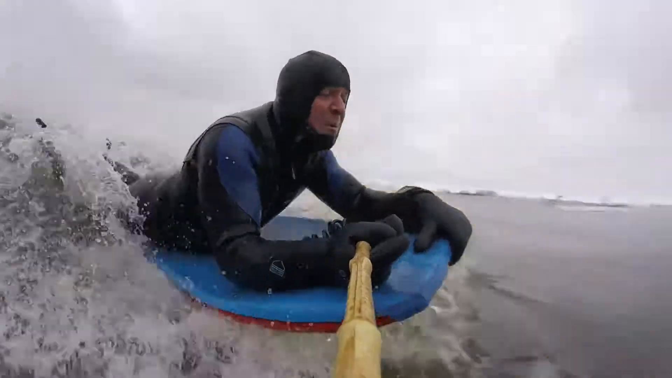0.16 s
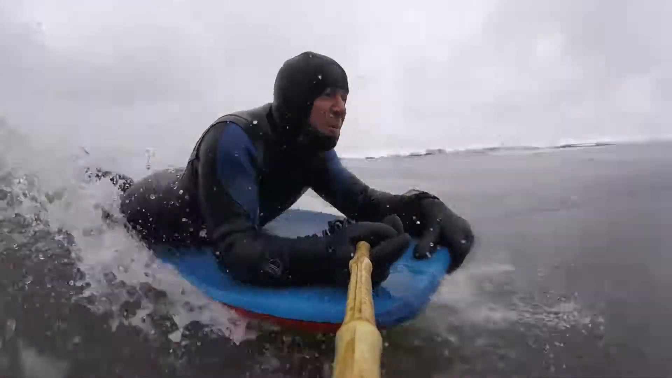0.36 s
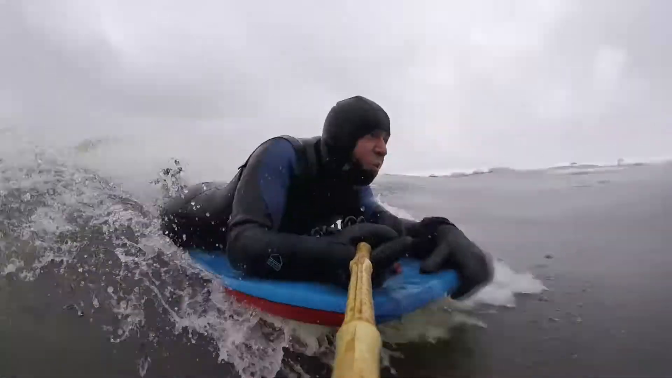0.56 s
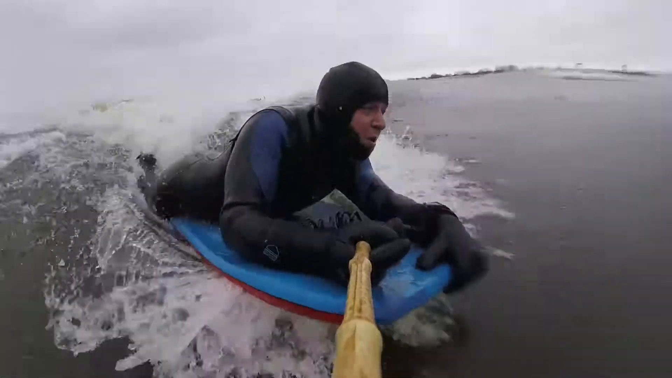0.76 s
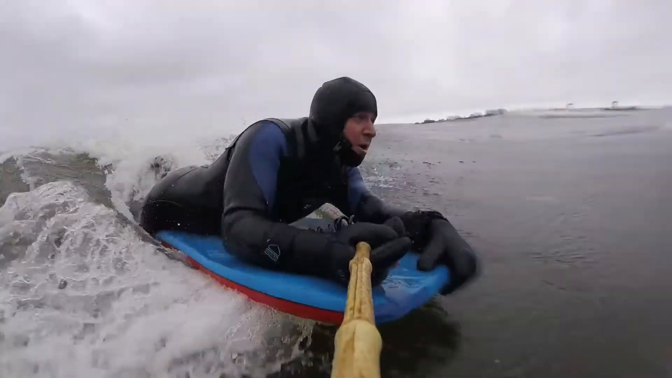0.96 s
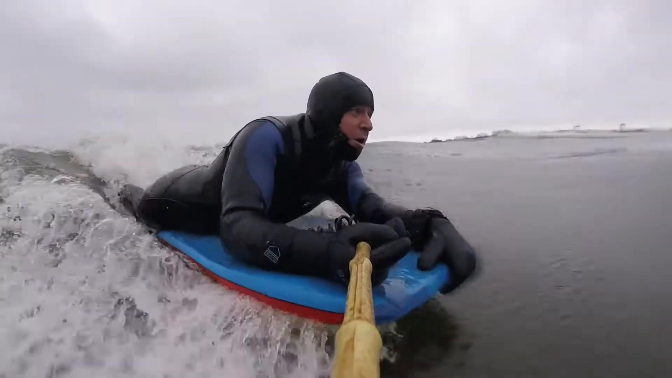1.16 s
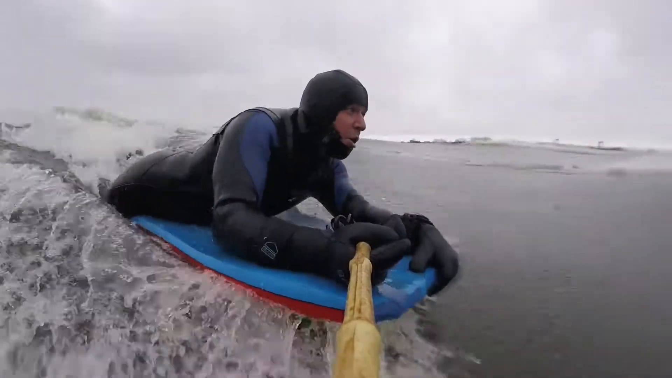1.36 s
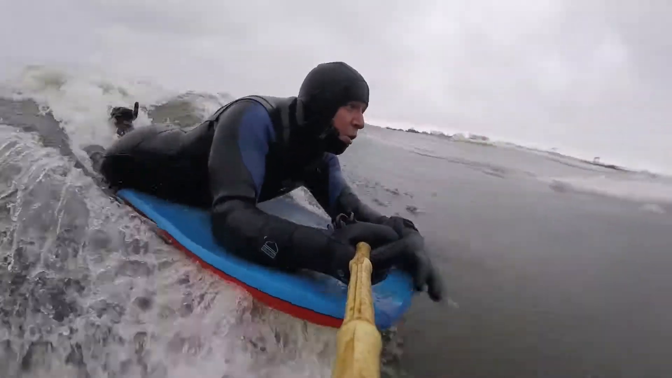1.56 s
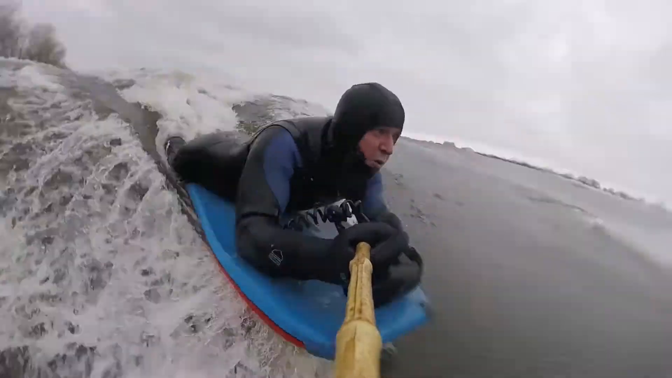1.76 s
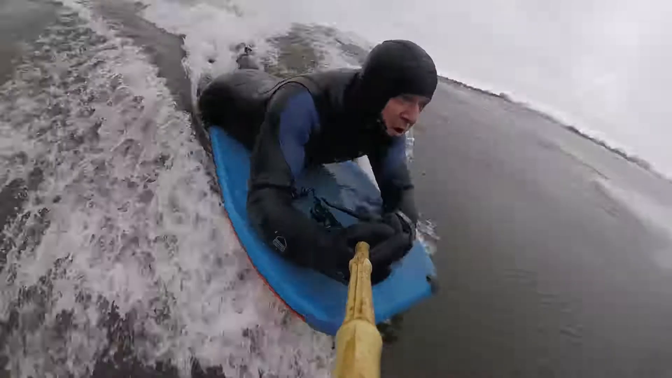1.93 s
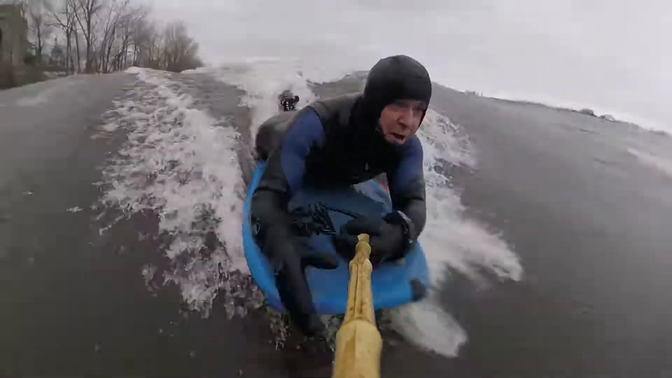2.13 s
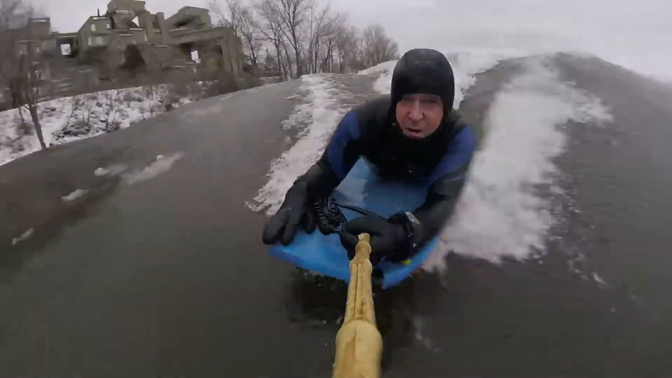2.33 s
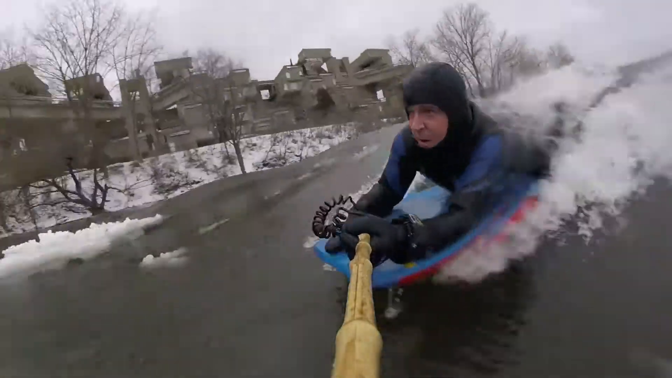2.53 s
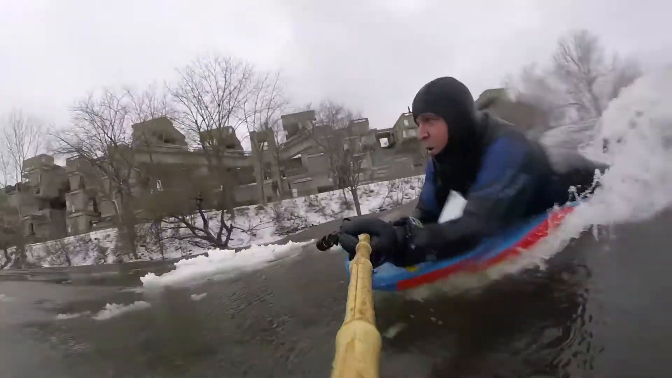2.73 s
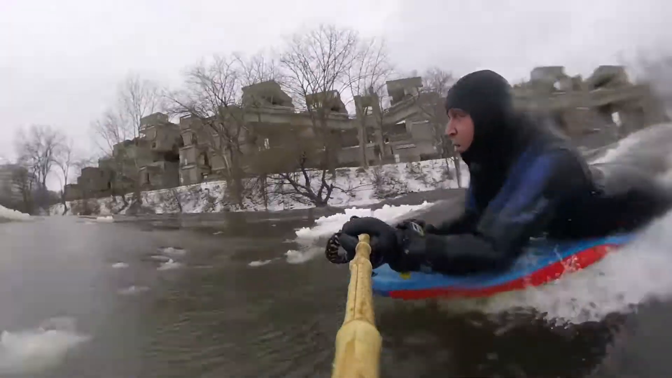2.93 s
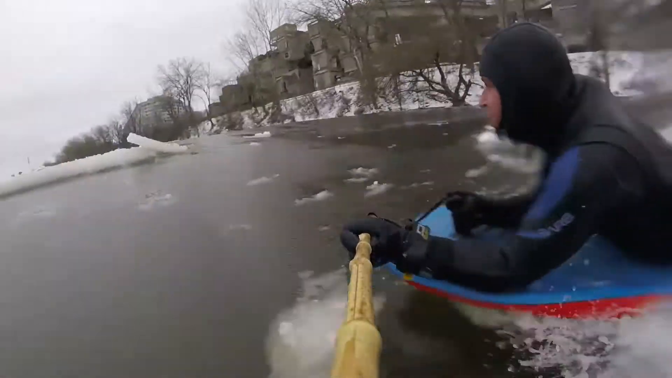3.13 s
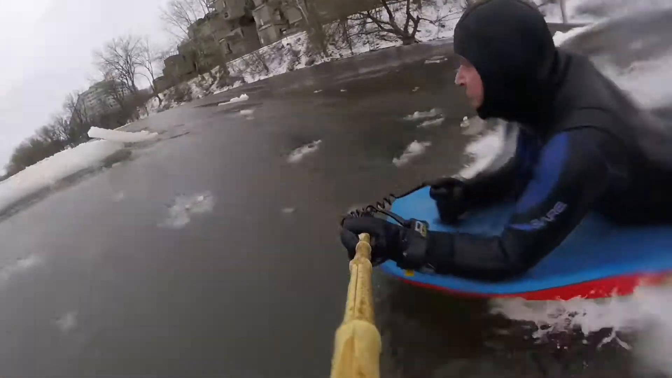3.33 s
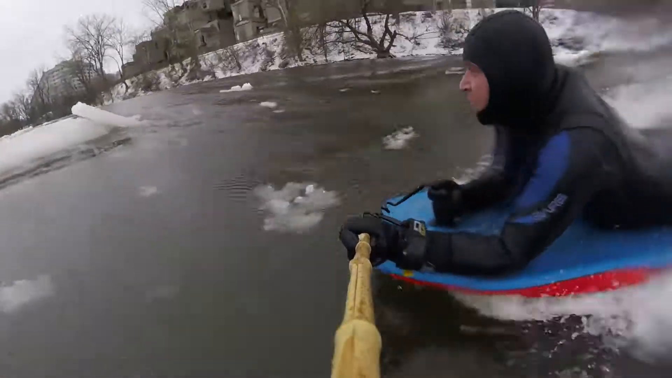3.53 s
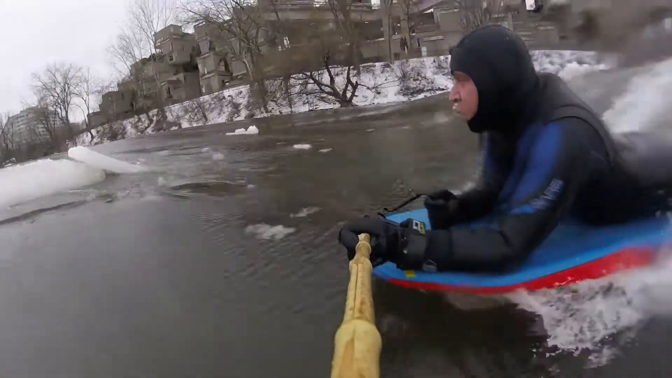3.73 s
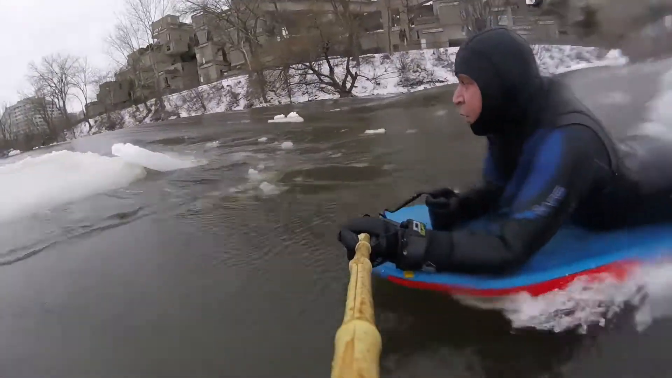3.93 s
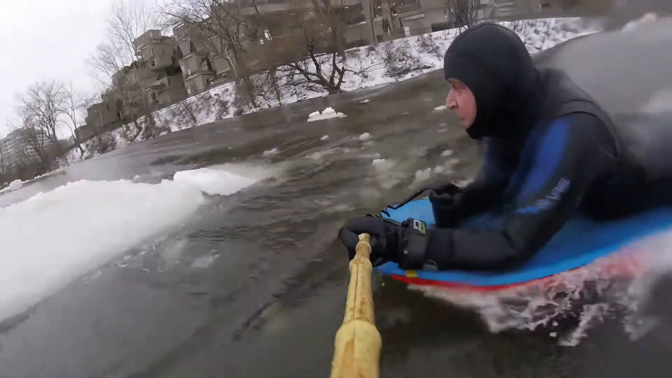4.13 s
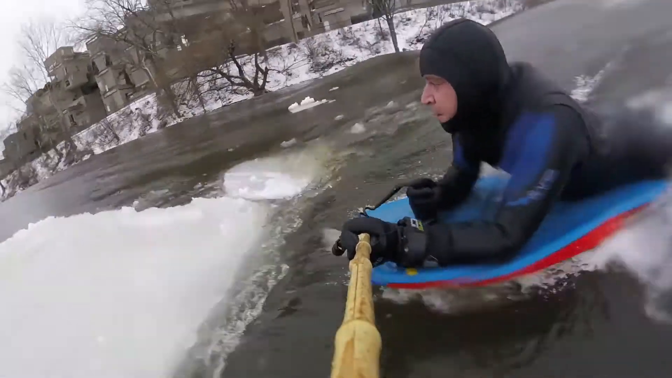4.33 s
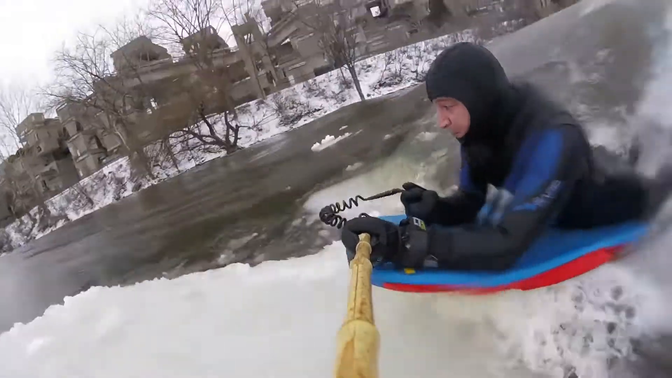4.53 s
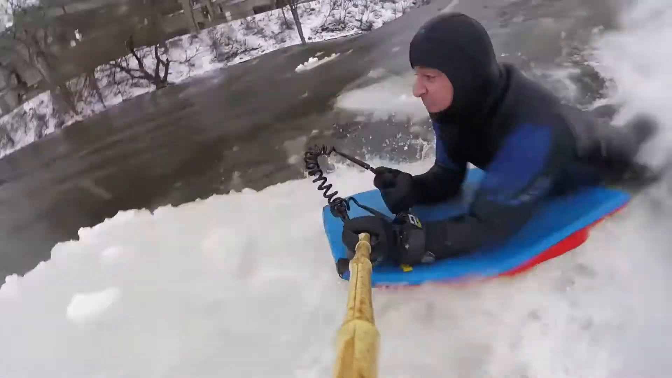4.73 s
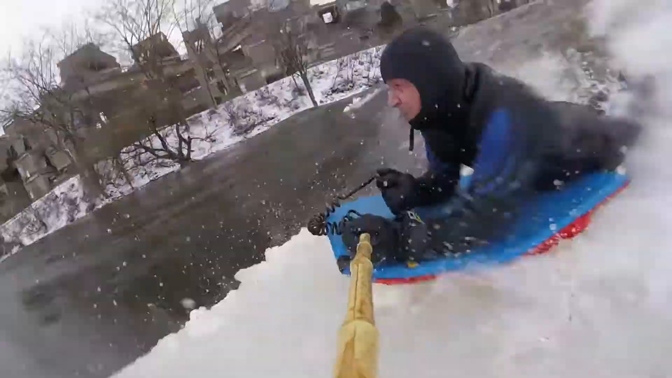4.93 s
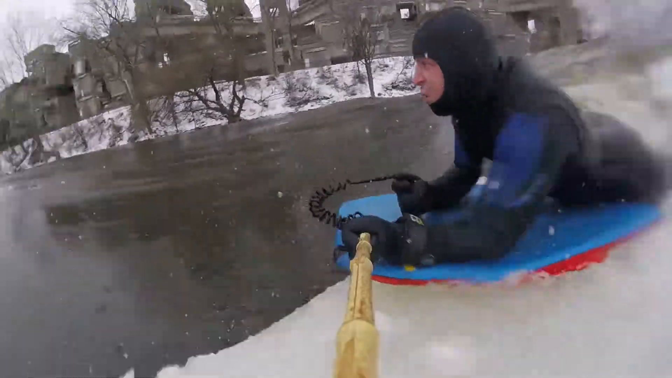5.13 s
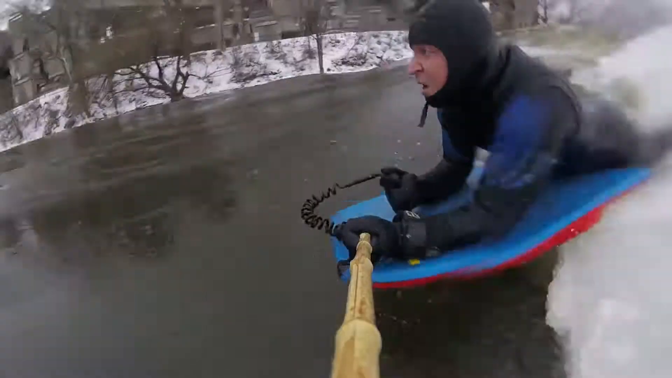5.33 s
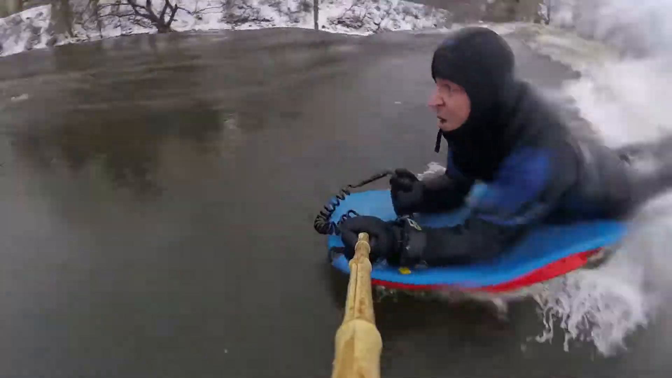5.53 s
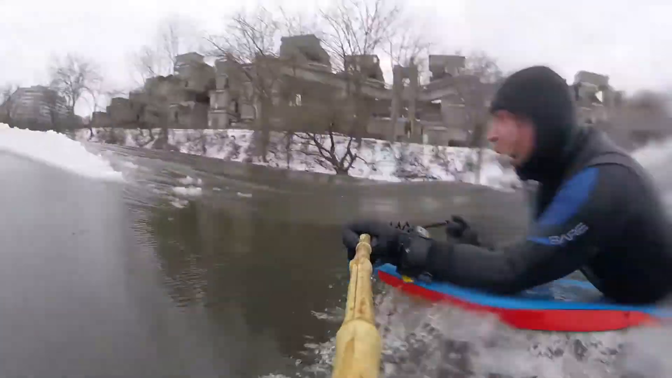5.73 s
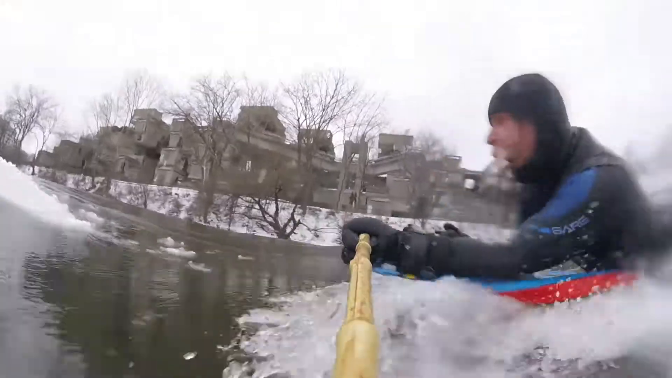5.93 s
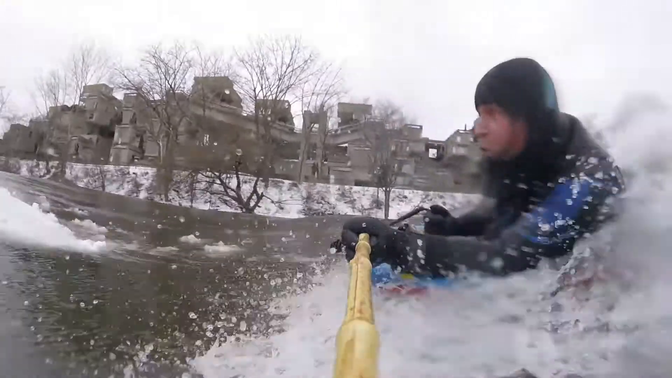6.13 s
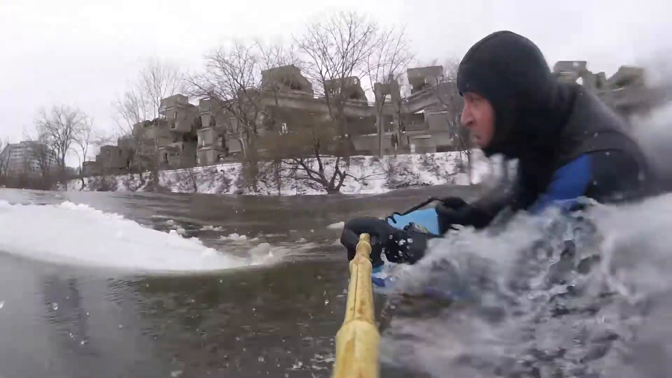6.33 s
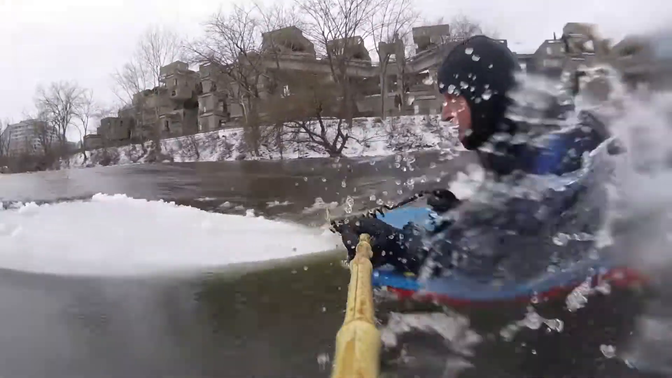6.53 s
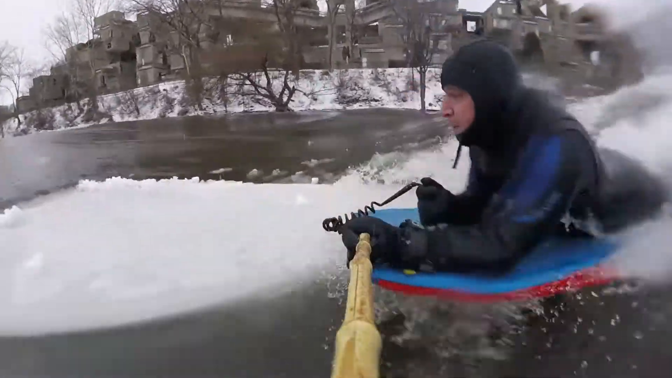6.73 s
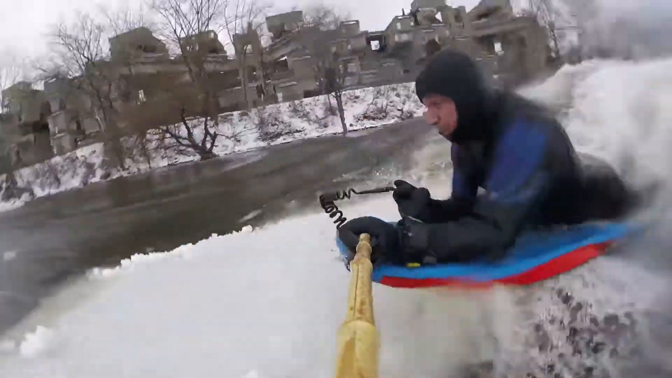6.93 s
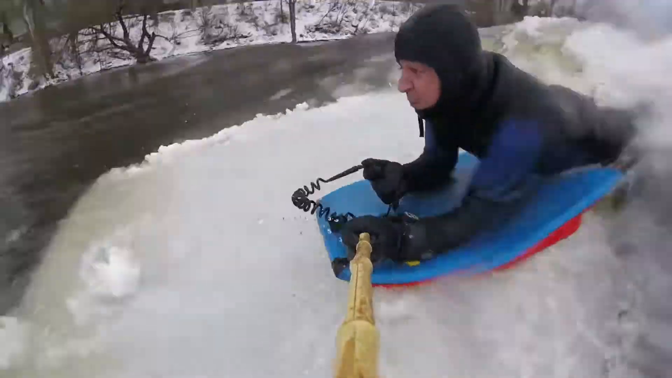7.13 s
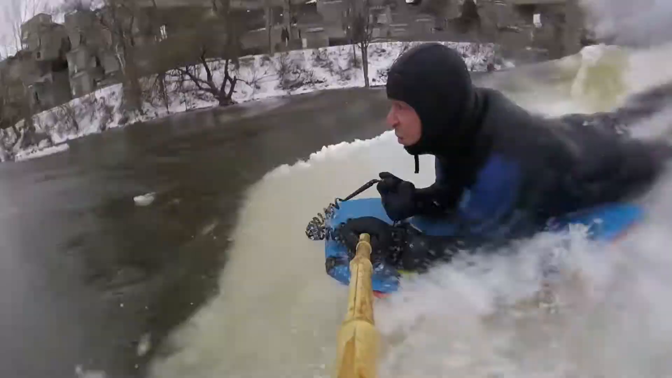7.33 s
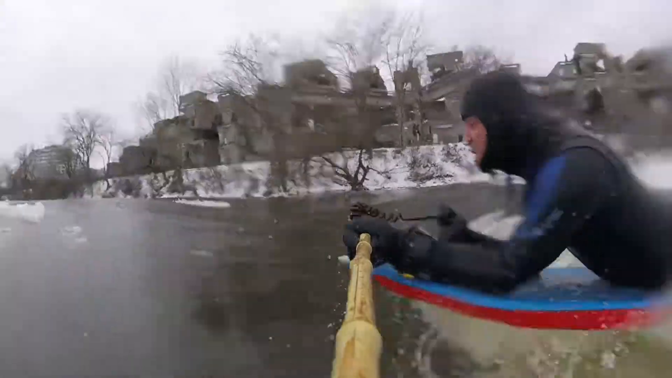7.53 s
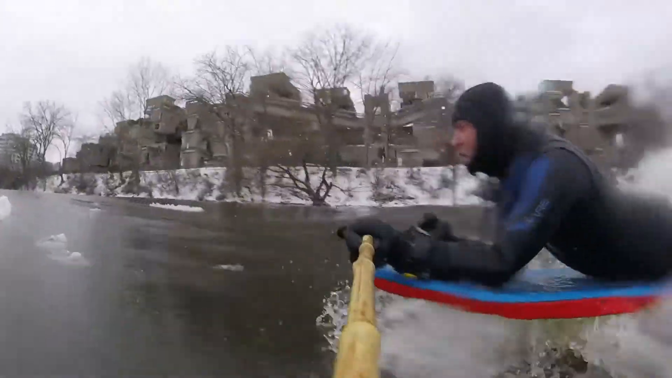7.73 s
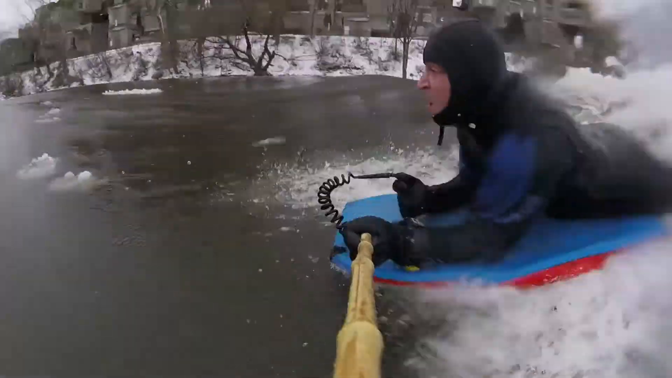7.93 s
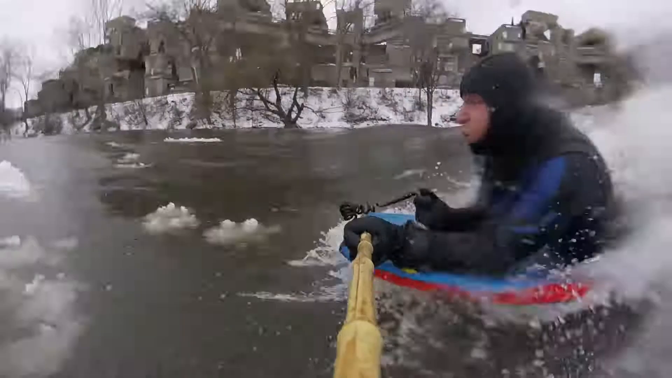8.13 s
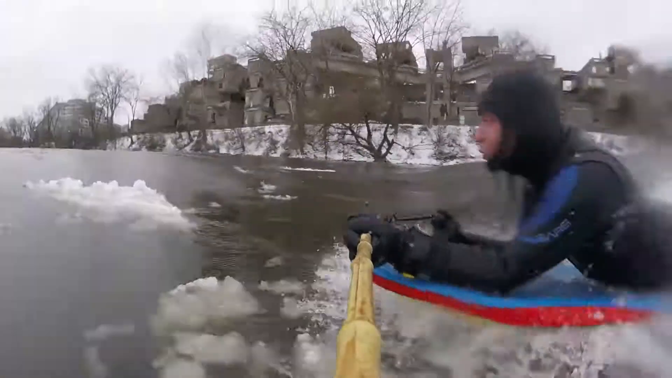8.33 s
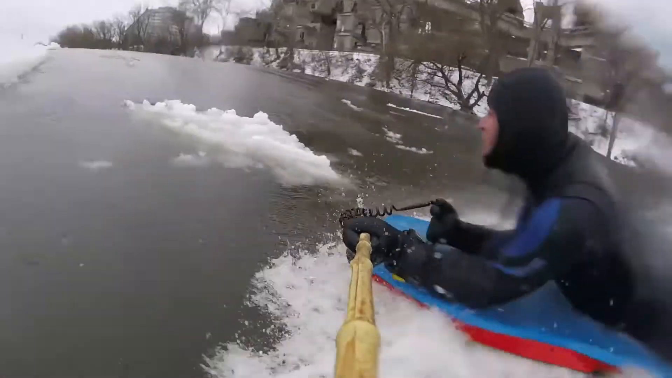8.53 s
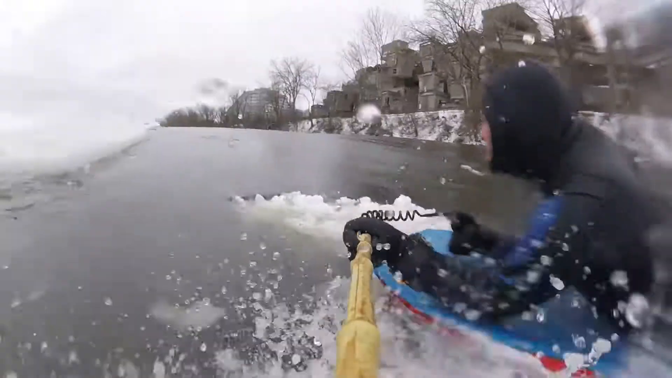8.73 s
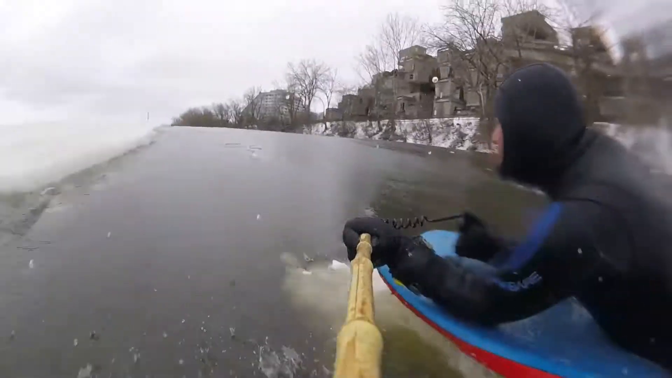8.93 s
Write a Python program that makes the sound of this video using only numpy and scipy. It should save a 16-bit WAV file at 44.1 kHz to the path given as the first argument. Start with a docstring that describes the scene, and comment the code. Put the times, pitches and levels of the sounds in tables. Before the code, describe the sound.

Bubbly, narrow hissing rush of white water around a bodyboard, surging and briefly choking, with sharp spray slaps and deep thumps through the handle.

```python
"""Board on a fast river

Fast water rushes and splashes around a board, heard by a camera microphone on the end of a wooden pole.
The rush is bubbly hiss through a narrow port that whistles near 5-6 kHz; spray wets, shifts and shuts it.
Splashes are noise bursts, blows on the board are gliding tones along the pole, and wind and slosh are
low noise with air bubbles. All of it reaches one microphone, close up."""
import sys
import numpy as np
from scipy import signal
from scipy.fft import rfft, irfft, next_fast_len
from scipy.io import wavfile
from scipy.ndimage import uniform_filter1d, minimum_filter1d, map_coordinates

SR = 44100
rng = np.random.default_rng(int(sys.argv[2]) if len(sys.argv) > 2 else 0)


def master_out(mix):
    """Clip the mix to full scale and print it as 16-bit PCM to the path in sys.argv[1]."""
    frames = np.transpose(np.atleast_2d(mix))
    ceiling = np.clip(frames, -1, 1)
    pcm = np.round(ceiling * 32767).astype(np.int16)
    wavfile.write(sys.argv[1], SR, pcm)


N = 395577  # samples

# The rush before surges: t/s, level in the port resonance/dB, resonance f/Hz, roar relative to it/dB
RUSH_COURSE = [(0, -25, 5490, -5), (.35, -26.5, 5270, -5.5), (.5, -29, 5410, -7), (1.0, -27, 5440, -9),
               (1.75, -25.5, 5340, -9), (2.1, -27, 5520, -8), (2.35, -31, 5420, -7), (2.9, -29.5, 5400, -4),
               (3.25, -27, 5380, -4.5), (3.7, -29, 5470, -4), (4.2, -29, 5430, -3), (4.65, -26, 5440, -5.5),
               (4.9, -23, 5840, -12), (5.4, -30, 6230, -6.5), (5.75, -22.5, 6360, -12),
               (6.05, -22.5, 5930, -11.5), (6.5, -28, 5615, -5), (7.0, -27.5, 5575, -9.5),
               (7.2, -24, 5600, -7.5), (7.5, -29.5, 5850, -8.5), (7.95, -26.5, 5720, -10),
               (8.3, -27.5, 6120, -14), (8.55, -25.5, 5890, -12.5), (8.97, -27.5, 5850, -9.5)]
# Surges of spray at the port (negative = brief dip): crest t/s, level/dB, rise/s, fall/s, resonance lift/(Hz/dB)
SPRAY_SURGES = [(.13, 6.5, 0.07, 0.2, 60), (.55, 3.5, 0.045, 0.025, 82), (.89, 2, 0.067, .06, 100),
                (1.24, 3.5, 0.087, .12, 8), (1.8, 1, .05, .05, 120), (1.92, 2.5, 0.082, 0.054, -2),
                (3.45, 2, 0.099, 0.14, 50), (4.36, 1.5, .06, 0.09, 30), (4.797, 6, 0.1, .001, 28),
                (4.96, -7, .03, 0.044, 25), (5.07, 1.5, .04, .06, 40), (5.572, 7, .03, 0.016, 10),
                (5.6, 7, .012, 0.014, 10), (6.1, 2, 0.038, .07, 10), (6.9, 2, 0.047, 0.069, 3),
                (7.33, 8, 0.058, 0.14, 10), (7.6, 1.5, 0.04, 0.045, 33), (7.89, 4, .04, 0.052, 3),
                (8.029, 9.5, 0.053, .001, 10), (8.1, 5, 0.058, 0.034, 50), (8.17, -5.5, .03, .03, 30),
                (8.25, 3, 0.032, 0.027, 52), (8.67, 4.5, 0.089, 0.05, 40), (8.9, 3, .04, 0.05, 30)]
# Water closing the port: t/s, level/dB, time constant of draining/s
PORT_SHUTS = [(1.99, -2, 0.42), (4.798, -3.5, .6), (4.83, -8, 0.66), (8.03, -9.5, .6)]
# Colour of the hiss with its peak low, middle and high, with a near-silent gap above the peak
# in the middle and high ones: f/Hz, relative level per Hz/dB
HISS_LOW = [(2060, -23.5), (3500, -21), (3970, -29), (4340, -19.5), (5110, -1.5), (5390, 0.5), (5710, -7),
            (6110, -16.5), (6580, -14), (7010, -31), (7620, -14), (10200, -15.5), (10600, -23),
            (11500, -41), (12300, -59), (16000, -82), (22000, -120)]
HISS_MIDDLE = [(2060, -23), (3500, -16), (4230, -20.5), (5080, -4), (5650, 1), (6540, -5), (6830, -23),
               (7190, -21.5), (7420, -84), (7580, -89), (7700, -27), (7830, -45), (8510, -27.5),
               (10600, -25), (12300, -58), (16000, -79), (22000, -120)]
HISS_HIGH = [(2060, -33.5), (3500, -28), (4580, -27.5), (4770, -21), (5530, -13), (6340, -2), (6650, -6.5),
             (7160, -23), (7990, -56), (8160, -85), (8290, -95), (9560, -92), (9810, -71), (11100, -50),
             (12300, -77), (16000, -70.5), (22000, -120)]
# Fizz above the hiss peak: resonance f/Hz, level relative to the peak/dB
FIZZ_LEVEL = [(5250, -15), (5450, -16.5), (5650, -22), (5900, -26.5), (6300, -33.5)]
# Colour of the roar: f/Hz, relative level per Hz/dB
ROAR_COLOUR = [(150, -38), (250, -2.5), (420, -1.5), (571, -3), (749, -3), (1260, -5.5), (1490, -5),
               (4200, -11), (5460, -25), (9240, -120)]
# Change of roar colour for each step of wetness: f/Hz, level/dB
WATER_FILM = [(500, 0), (1000, 0), (2500, 0.5), (4200, -5)]
# Drops and slaps of spray: t/s, slap level/dB, port ring level/dB, slap pitch f/Hz, time to crest/s
SPRAY_DROPS = [(0.026, -23, -27, 900, 0.0028), (0.277, -22, -30, 600, .002), (0.402, -27, -38, 900, .002),
               (0.502, -31, -23, 1200, 0.0014), (4.1610, -30, -37, 900, 0.0023),
               (4.3600, -24, -32, 1200, .007), (4.375, -29, -29, 1200, 0.0027),
               (4.382, -25, -23, 1500, 0.0028), (5.034, -33, -32, 2500, 0.0022),
               (5.042, -31, -35, 2200, 0.0037), (5.0890, -31, -26, 1800, 0.0017),
               (5.212, -21, -22, 2070, 0.001), (5.232, -32, -31, 1980, 0.0064),
               (5.5520, -30.5, -30, 1200, 0.0018), (5.5630, -28.5, -20, 895, .006),
               (5.6, -28, -13, 1500, 0.0011), (6.1210, -33, -22, 900, 0.00087),
               (6.465, -28, -29, 900, 0.0018), (7.188, -30, -23, 1190, 0.012),
               (7.211, -24.5, -24, 1170, 0.01), (7.317, -27, -29, 1000, 0.0033),
               (7.325, -26, -14, 900, 0.0026), (7.391, -31, -17, 1680, 0.0022),
               (7.448, -25.5, -32, 770, 0.0017), (7.663, -31, -37, 500, 0.0086),
               (7.888, -37, -14, 1500, .002), (8.014, -27, -33, 444, 0.0071)]
# Blows carried by the pole: t/s, level/dB, first f/Hz, last f/Hz, after-ring relative to the blow/dB
POLE_THUMPS = [(.227, -22, 110, 80, -20), (0.262, -20, 120, 64.7, -20), (0.2738, -12, 500, 250, -23),
               (.292, -13, 300, 180, -17), (0.318, -15, 130, 70, -20), (0.401, -8.5, 186, 123, -22),
               (.415, -14.5, 403, 130, -20), (1.868, -14, 120, 79, -12), (1.908, -15, 80, 60, -11),
               (1.973, -19, 110, 70.4, -18), (2.01, -8, 220, 42, -22), (2.103, -18, 90, 75.5, -5),
               (2.128, -13, 200, 55.7, -11), (2.344, -20, 350, 170, -20), (2.375, -14, 90, 59.6, -12),
               (2.416, -13.5, 130, 85, -21), (2.48, -14, 447, 199, -20), (2.4915, -18, 129, 109, -15),
               (2.5195, -12.5, 250, 130, -9), (2.544, -25, 110, 60, -15), (2.618, -20, 90, 55, -15),
               (2.669, -18.5, 80, 55, -15), (4.357, -13, 400, 190, -21), (4.377, -13, 450, 270, -20),
               (4.86, -6.5, 372, 38, -7), (4.982, -16.5, 248, 44.3, -26), (5.244, -26, 146, 70, -15),
               (7.185, -18, 120, 45, -12), (7.211, -16, 150, 70, -21), (7.226, -15.5, 160, 100, -15),
               (7.275, -13, 202, 54, -8), (7.4452, -9, 425, 100, -8.5), (7.468, -15, 272, 211, -24),
               (7.79, -20, 200, 90, -15), (7.844, -23, 150, 70, -15), (8.074, -6, 390, 43, -7.5)]
# Bending modes of the pole: f/Hz, level within the after-ring/dB, time to fall 60 dB/s
POLE_MODES = [(71, 1.5, 0.15), (160, -20, 0.054)]
# Wind and slosh at the mic: t/s, buffet level/dB, flutter level/dB
WIND_COURSE = [(0, -40, -29), (.12, -26.5, -31.5), (.3, -29.5, -26), (.65, -37, -33), (1.37, -41.5, -39),
               (1.7, -35, -41), (2.07, -32, -35.5), (2.4, -25, -33), (2.5, -31, -29), (2.65, -24, -33),
               (2.72, -39, -36), (2.95, -32.5, -34.5), (3.2, -35, -35), (4.32, -41, -36.5),
               (4.65, -34, -34.5), (4.87, -41, -42), (5.3, -42, -38), (5.57, -35, -40.5), (5.95, -43, -32),
               (6.29, -45, -36), (6.59, -41, -30.5), (6.94, -41, -36), (7.32, -36, -31.5), (7.47, -47, -42),
               (7.67, -45, -33.5), (7.92, -36, -42), (8.03, -55, -34.5), (8.15, -42.5, -46.5),
               (8.87, -47.5, -39), (8.97, -46, -37)]
# Colours of buffet and flutter: f/Hz, relative level per Hz/dB
BUFFET_COLOUR = [(15, -13), (30, 7), (50, 6), (90, 3), (140, -5.5), (250, -58)]
FLUTTER_COLOUR = [(80, -3.5), (140, 2), (250, -1.5), (400, -3.5), (700, -17), (1200, -61)]

TOP_HZ = 12400  # band limit of the microphone signal
FRAME, HOP_OVERLAP = 512, 384  # samples
SURGE_ROAR = 0.28  # share of a surge that the roar follows, in dB
GLIDE_S = 0.0038  # time constant of a thump's fall in pitch
SWELL_CYCLES = 0.603  # time scale of a thump, in cycles of its last pitch


def rush():
    """White water through the port: a hiss whose peak climbs as the port gets wetter, over a roar."""
    white_water = churn(crackle_db=-7, spread_db=4, count=30000)
    hz, t, spectrum = signal.stft(white_water, SR, nperseg=FRAME, noverlap=HOP_OVERLAP)
    _, peak_hz, roar_db = curves(RUSH_COURSE, t)
    surge_db, lift_hz = surges(t)
    peak_hz = peak_hz + lift_hz
    roar_db = roar_db - (1 - SURGE_ROAR) * surge_db  # the surge itself is added to everything below
    wetness = np.interp(peak_hz, [5400, 5620, 6280], [0, 1, 2])

    def band_rms(gain, low_hz, high_hz):
        """Rms gain of each frame within a band, counted over the full spectrum."""
        band = (hz > low_hz) & (hz < high_hz)
        return np.sqrt(np.sum(gain[band] ** 2, axis=0) / len(hz))

    hiss_db = 0
    for step, colour in enumerate((HISS_LOW, HISS_MIDDLE, HISS_HIGH)):
        weight = np.clip(1 - abs(wetness - step), 0, 1)
        hiss_db = hiss_db + np.maximum(along(colour, hz), -72)[:, None] * weight
    hiss = amp(hiss_db)

    # the whistling peak and the fizz above it are levelled apart
    above = hz[:, None] > np.interp(wetness, [0, 1, 2], [7000, 7500, 8800])
    whistle_gain = ~above / band_rms(hiss, 4500, 7200)
    fizz_gain = above * amp(along(FIZZ_LEVEL, peak_hz)) / band_rms(hiss, 7800, 11500)
    hiss = hiss * (whistle_gain + fizz_gain)

    roar = amp(along(ROAR_COLOUR, hz)[:, None] + wetness * along(WATER_FILM, hz)[:, None])
    roar = roar / band_rms(roar, 500, 4000) * amp(roar_db)

    # passing patches of foam, smoothed over 6 bins and 24 frames
    foam = uniform_filter1d(rng.standard_normal(spectrum.shape), 6, 0)
    foam = unit(uniform_filter1d(foam, 24, 1))
    coloured = spectrum * np.hypot(hiss, roar) * amp(0.77 * foam)
    water = signal.istft(coloured, SR, nperseg=FRAME, noverlap=HOP_OVERLAP)[1][:N]

    now = np.arange(N) / SR
    level_db = curves(RUSH_COURSE, now)[0] + surges(now)[0] + shut(now)
    return water * amp(level_db + 0.49 * wobble(9) + 0.52 * wobble(25))


def churn(crackle_db, spread_db, count):
    """White water: even hiss with tiny bursting bubbles of very unequal size on top."""
    when, sign, size = rng.random((count, 3)).T
    pops = np.sign(sign - .5) * amp(-spread_db * np.log(size + 0.011))
    clicks = np.bincount((when * N).astype(int), pops, N)
    return unit(rng.standard_normal(N) + amp(crackle_db) * unit(clicks))


def surges(t):
    """Spray surges summed as lopsided bells: level in dB and lift of the port resonance in Hz."""
    level_db, lift_hz = 0, 0
    for crest, db, rise, fall, hz_per_db in SPRAY_SURGES:
        bell = db * np.exp(-((t - crest) / np.where(t < crest, rise, fall)) ** 2)
        level_db, lift_hz = level_db + bell, lift_hz + bell * hz_per_db
    return level_db, lift_hz


def shut(t):
    """Level change in dB as water closes the port: a sudden drop that fades as it drains."""
    return sum(db * (t > s) * np.exp(-abs(t - s) / drain) for s, db, drain in PORT_SHUTS)


def splashes():
    """Each drop is a short burst of noise around its own pitch, part of it ringing the wetted port."""
    out, t = np.zeros(N + SR), np.arange(SR // 10) / SR

    def whistle(hz):
        """Hiss colour midway between its middle and high peak."""
        return amp((along(HISS_MIDDLE, hz) + along(HISS_HIGH, hz)) / 2)

    for s, slap_db, port_db, pitch_hz, crest_s in SPRAY_DROPS:
        def slap(hz):
            """A hump around the pitch in octaves, falling away steeply above 4 kHz."""
            octaves = np.log2((hz + 1) / pitch_hz)
            return amp(-4 * octaves ** 2) / (1 + (hz / 4000) ** 8)

        body = unit(filtered(rng.standard_normal(len(t)), slap))
        ring = unit(filtered(rng.standard_normal(len(t)), whistle))
        u = t / crest_s
        envelope = (u * np.exp(1 - u)) ** 2
        out[round(s * SR):][:len(t)] += envelope * (amp(slap_db) * body + amp(port_db) * ring)
    return out[:N]


def thumps():
    """Bending waves run up the pole, high pitches first, then its modes ring out."""
    out, t = np.zeros(N + SR), np.arange(SR // 3) / SR
    for s, db, first_hz, last_hz, ring_db in POLE_THUMPS:
        swell_s = SWELL_CYCLES / last_hz
        u = t / swell_s
        turns = last_hz * t + (first_hz - last_hz) * GLIDE_S * (1 - np.exp(-t / GLIDE_S))
        wave = u ** 0.75 * np.exp(.35 - 0.62 * u ** 2) * np.sin(2 * np.pi * turns)
        late = np.clip(t - 1.5 * swell_s, 0, None)  # the modes start as the wave dies
        ring = 0
        for hz, mode_db, t60 in POLE_MODES:
            ring = ring + amp(mode_db - 60 * late / t60) * np.sin(2 * np.pi * hz * late)
        out[round(s * SR):][:len(t)] += amp(db) * (wave + amp(ring_db) * ring)
    return out[:N]


def wind():
    """Turbulence presses on the port in lumps; the slosh flutters along the pole with its bubbles."""
    buffet_db, flutter_db = curves(WIND_COURSE, np.arange(N) / SR)
    lumps = wobble(18)
    buffet = unit(amp(3.2 * lumps) * coloured_noise(BUFFET_COLOUR))
    bubbles = gurgle(centre_hz=320.5, cycles=4.0, spread_db=3, count=900)
    slosh = coloured_noise(FLUTTER_COLOUR) + amp(-5) * bubbles
    flutter = unit(amp(1.3 * lumps) * slosh)
    return amp(buffet_db) * buffet + amp(flutter_db) * flutter


def gurgle(centre_hz, cycles, spread_db, count):
    """Pockets of air slosh under the board: soft-starting low bubbles whose pitch rises a little."""
    draw, t = rng.random((count, 3)), np.arange(SR // 25) / SR
    turns = centre_hz * np.exp(1.61 * (draw[:, 1:2] - .5)) * t
    size = amp(-spread_db * np.log(draw[:, 2:] + 0.028))
    envelope = turns * np.exp(-3 * turns / cycles)
    bubbles = size * envelope * np.sin(2 * np.pi * turns * (1 + 0.035 * turns))
    where = (draw[:, :1] * N).astype(int) + np.arange(len(t))
    return unit(np.bincount(where.ravel(), bubbles.ravel(), N)[:N])


def coloured_noise(colour):
    """Steady noise of the given colour, at rms 1."""
    return unit(filtered(rng.standard_normal(N), lambda hz: amp(along(colour, hz))))


def amp(db):
    """Decibels to gain."""
    return 10 ** (np.asarray(db) / 20)


def unit(x):
    """Scaled to rms 1."""
    return x / np.sqrt(np.mean(x ** 2) + 1e-20)


def along(points, hz):
    """(f/Hz, value) points read on a log frequency axis."""
    f, v = np.transpose(points)
    return np.interp(np.log(hz + 1), np.log(f + 1), v)


def curves(rows, t):
    """Each column after the time, read at times t."""
    s, *columns = np.transpose(rows)
    return [np.interp(t, s, column) for column in columns]


def wobble(rate):
    """A smooth random curve, rate knots a second."""
    knots = rng.standard_normal(int(N * rate / SR) + 4)
    return map_coordinates(knots, [np.arange(N) * rate / SR])


def filtered(x, response):
    """x shaped by a gain that depends on frequency in Hz."""
    m = next_fast_len(len(x) + 8192)
    return irfft(rfft(x, m) * response(np.fft.rfftfreq(m, 1 / SR)), m)[:len(x)]


def scene():
    """One microphone feeds both channels."""
    mic = rush() + splashes() + thumps() + wind()
    return np.tile(mic, (2, 1))


def record(dry):
    """A limiter holds peaks to half of full scale, then everything above the band limit is removed."""
    need = np.minimum(1, .5 / (abs(dry) + 1e-9))
    lowest = minimum_filter1d(need, size=180, axis=1)  # about 4 ms around each peak
    held = dry * uniform_filter1d(lowest, size=90, axis=1)
    return np.array([filtered(side, lambda hz: hz < TOP_HZ) for side in held])


dry = scene()
out = record(dry)
master_out(out)
```